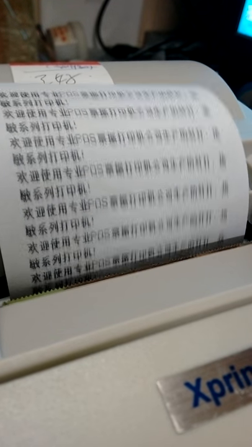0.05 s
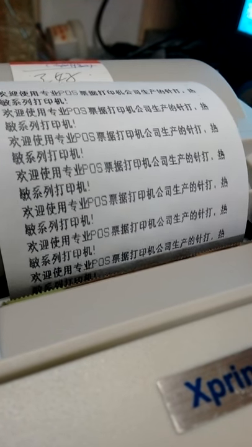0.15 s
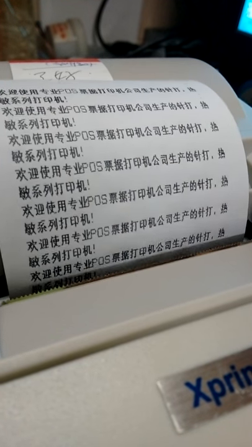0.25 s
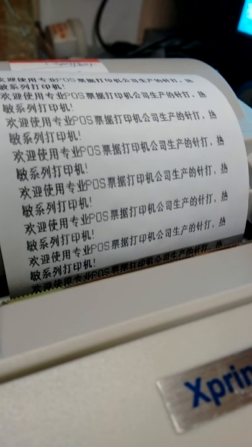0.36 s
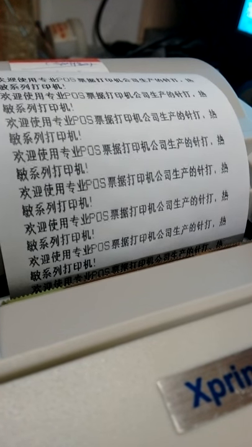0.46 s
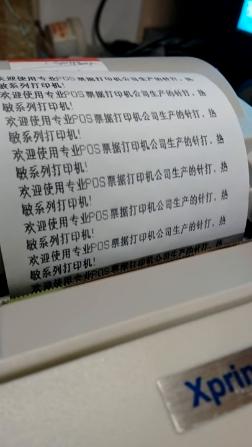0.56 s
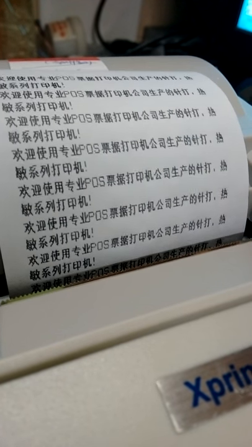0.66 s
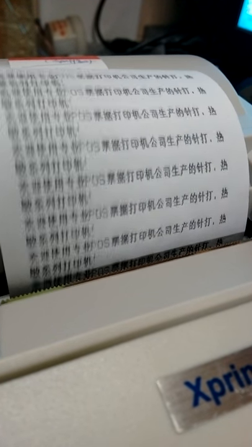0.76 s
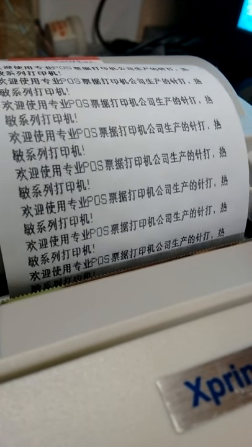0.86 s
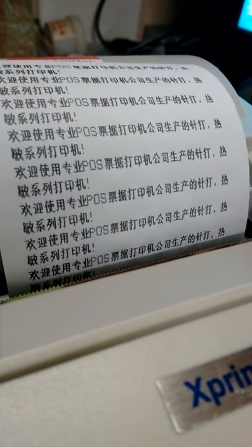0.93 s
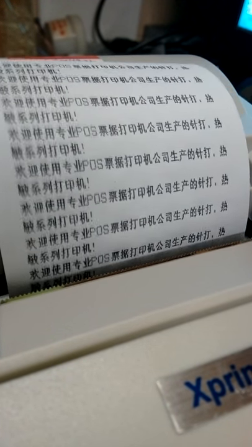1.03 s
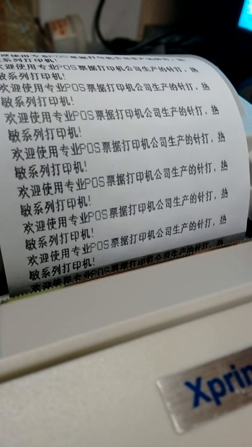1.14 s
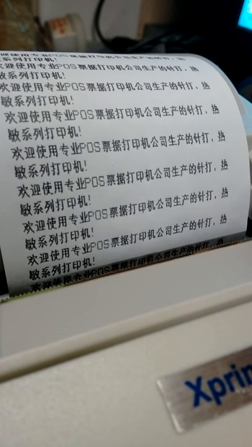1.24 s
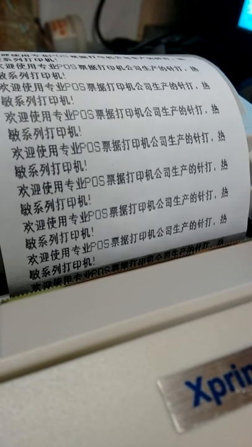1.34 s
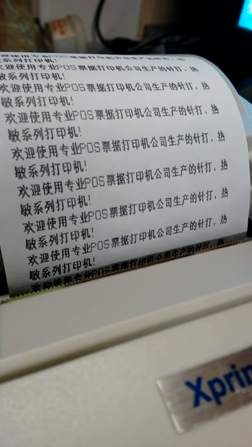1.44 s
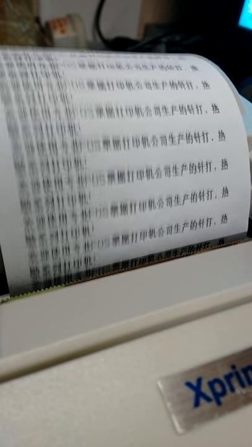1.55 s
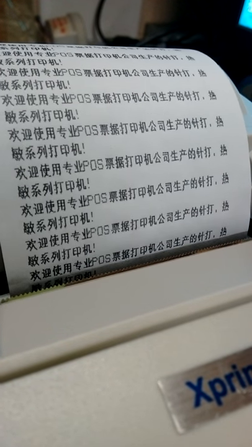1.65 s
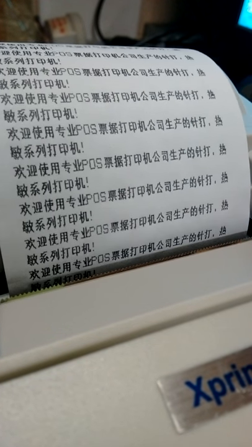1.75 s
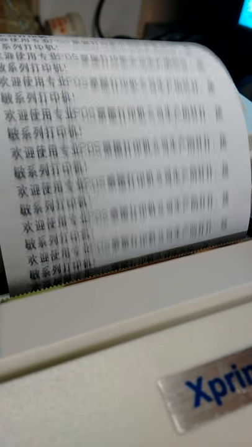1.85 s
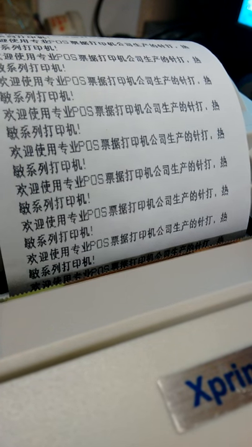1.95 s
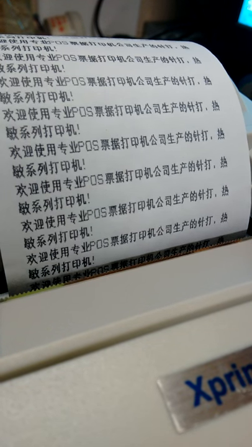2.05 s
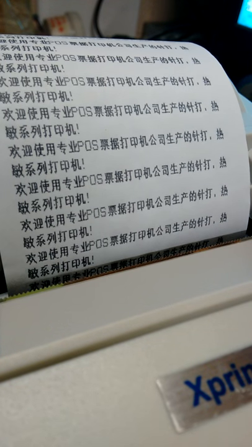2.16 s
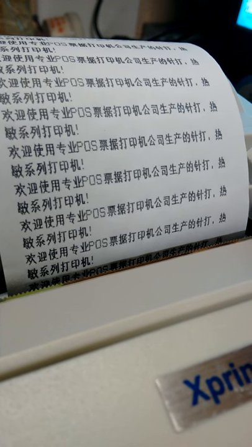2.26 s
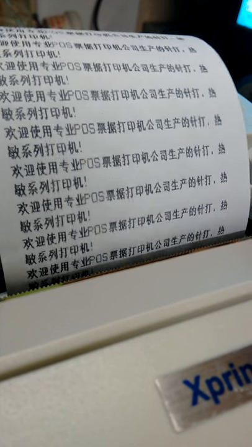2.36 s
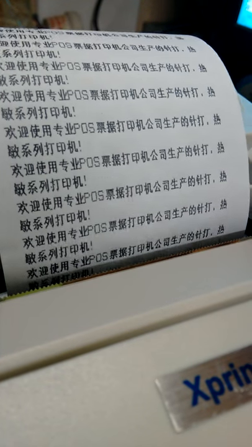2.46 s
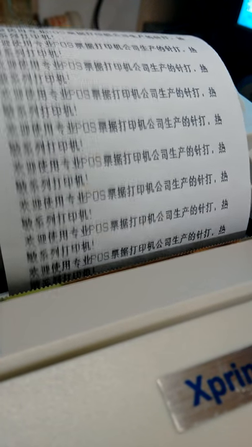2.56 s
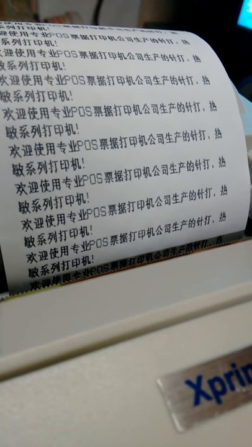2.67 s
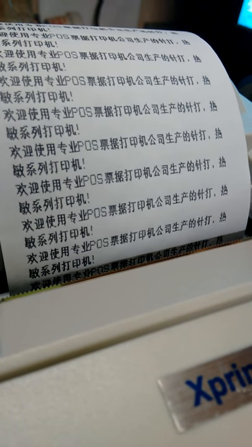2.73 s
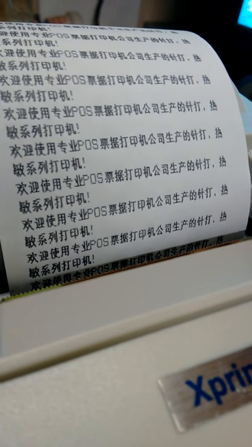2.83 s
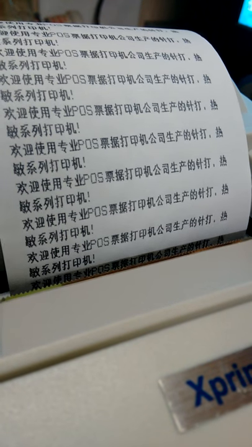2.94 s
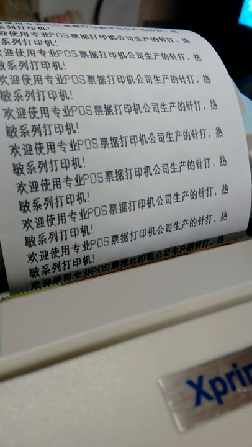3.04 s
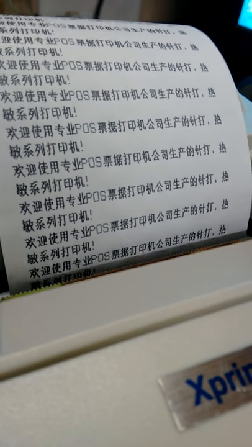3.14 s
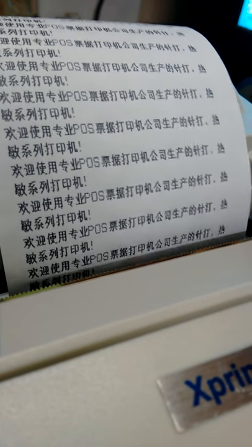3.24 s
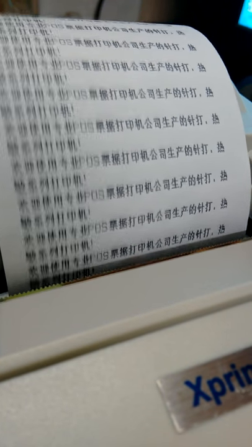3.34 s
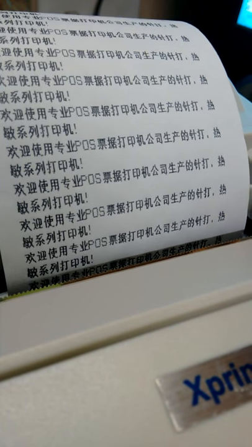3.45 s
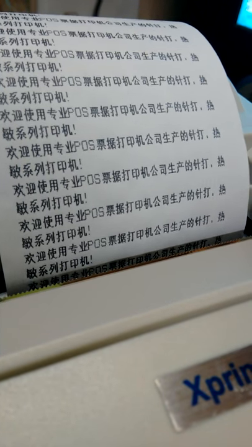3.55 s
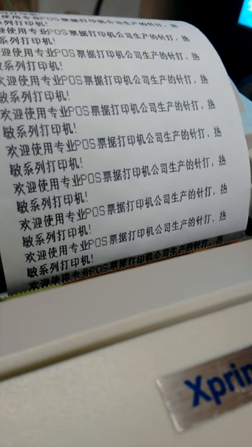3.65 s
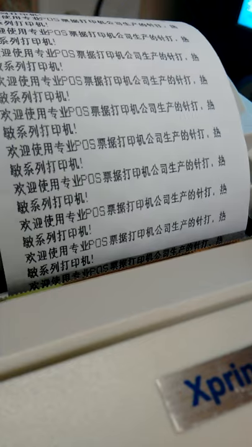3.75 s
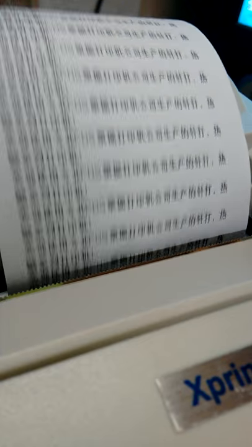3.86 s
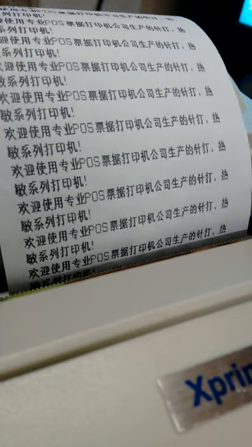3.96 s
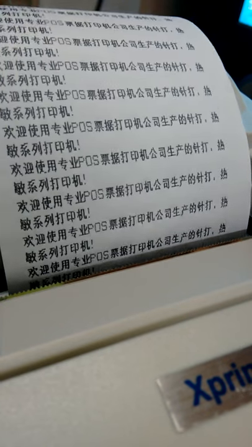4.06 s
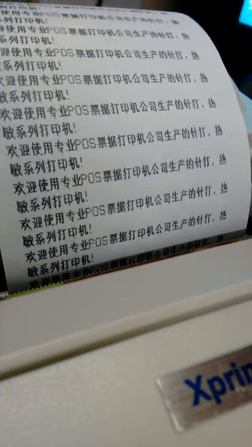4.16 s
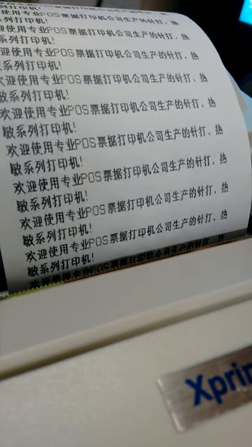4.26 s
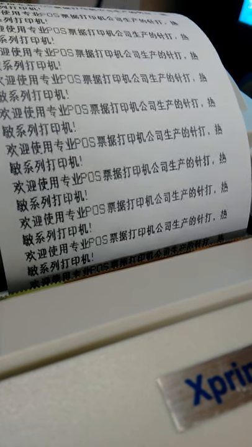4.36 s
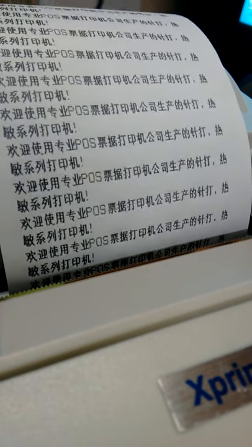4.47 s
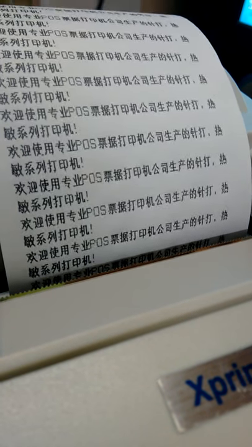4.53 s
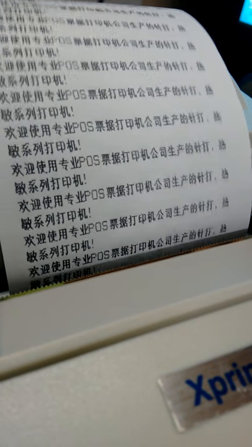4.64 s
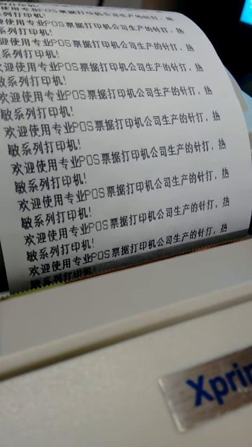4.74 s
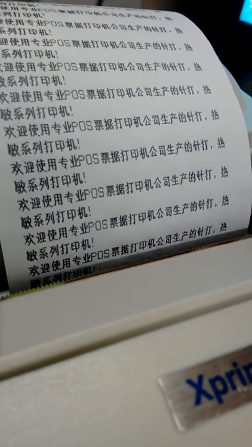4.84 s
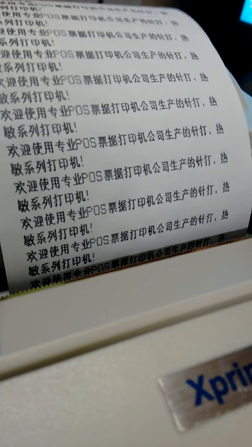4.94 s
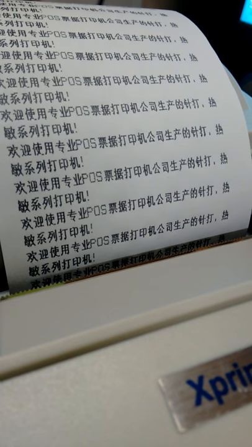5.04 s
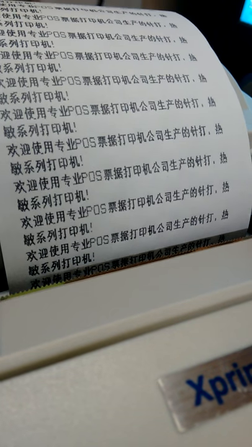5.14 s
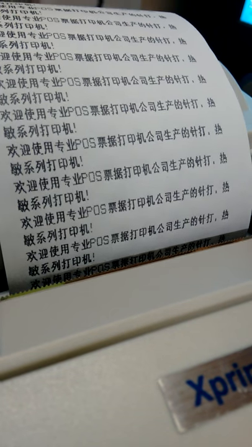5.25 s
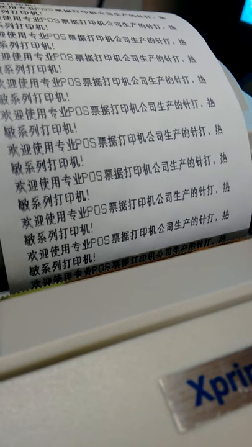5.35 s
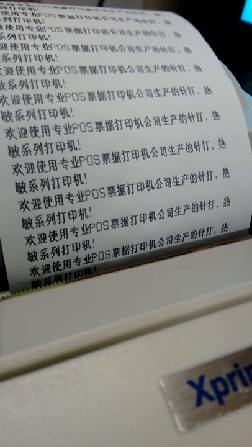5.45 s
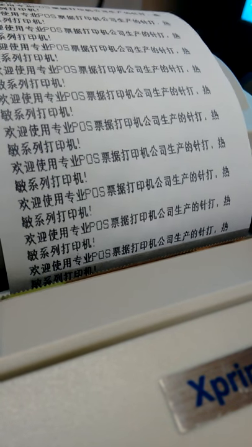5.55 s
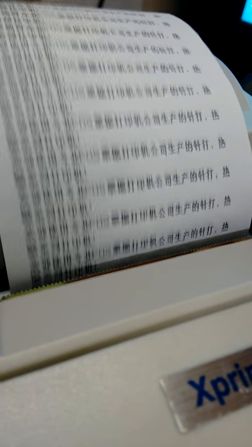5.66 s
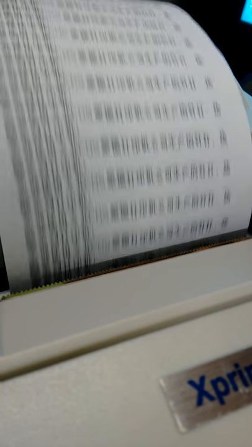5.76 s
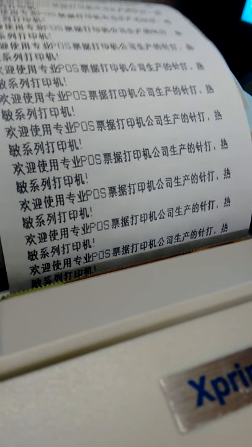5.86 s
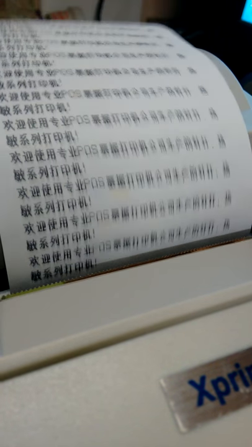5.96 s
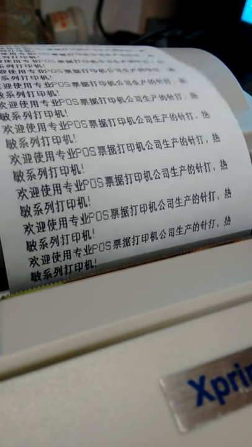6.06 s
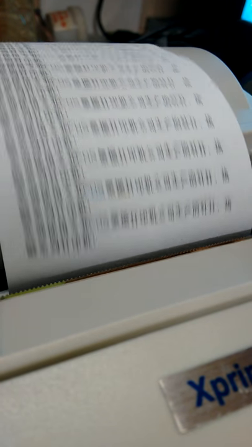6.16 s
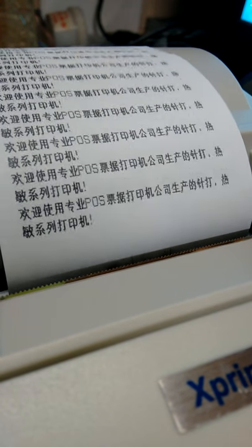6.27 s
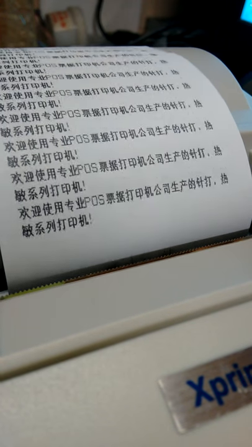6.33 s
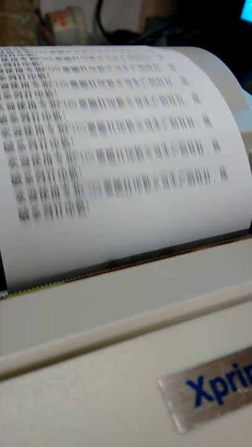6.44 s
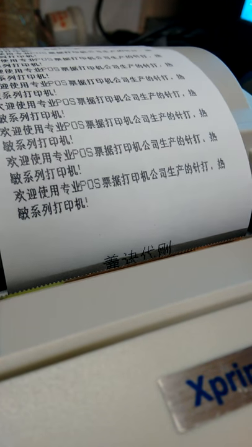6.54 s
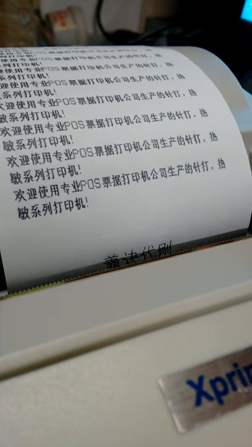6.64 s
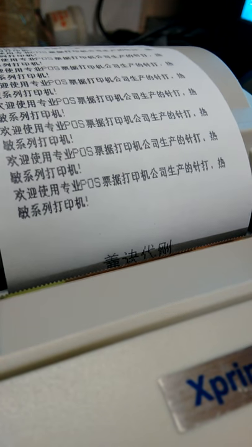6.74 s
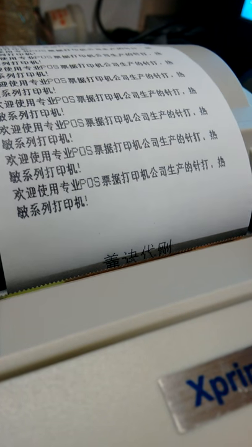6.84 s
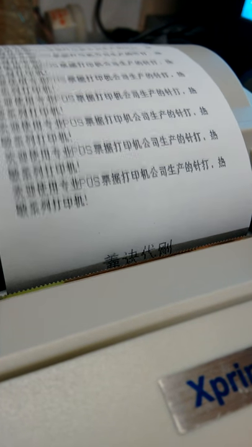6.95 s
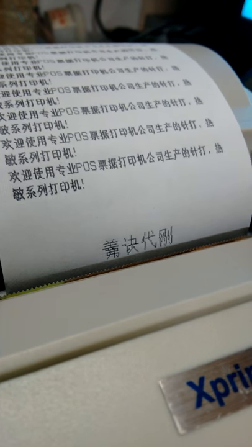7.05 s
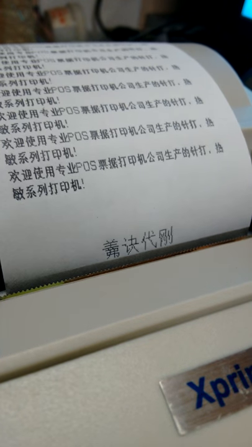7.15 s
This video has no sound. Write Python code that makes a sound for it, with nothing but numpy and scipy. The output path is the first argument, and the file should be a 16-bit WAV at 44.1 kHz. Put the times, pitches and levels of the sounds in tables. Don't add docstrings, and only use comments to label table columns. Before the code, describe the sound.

Pins hammer paper in fast, gritty zips, some long and some mere ticks, over a low motor rumble and belt hiss. Rattles and hollow case knocks fill the gaps in a regular mechanical loop. Near the end the loop breaks: gears engage, the feed motor whirs briefly, shorter buzzes follow, another feed, then scattered scratches and clacks. Close hand-held stereo pickup at a desk, piercing and mildly distorted, with a short room echo.

```python
import sys
import numpy as np
from scipy import signal
from scipy.fft import rfft, irfft, next_fast_len
from scipy.io import wavfile
from scipy.ndimage import uniform_filter1d, map_coordinates

SR = 44100
rng = np.random.default_rng(int(sys.argv[2]) if len(sys.argv) > 2 else 0)


def voltage_ratio(decibels):
    exponent = np.asarray(decibels, float) / 20
    return 10 ** exponent


def inscribe(sig):
    pcm = np.round(np.clip(np.atleast_2d(sig).T, -1, 1) * 32767)
    wavfile.write(sys.argv[1], SR, pcm.astype(np.int16))


N = 317500

COLUMN_HZ = 2369
CYCLE_START_S, CYCLE_S, CYCLE_END_S = .526, .7636, 5.76
RUN_AFTER_S = .066
# (start [s], strength [dB], fast run [s])
PAPER_FEEDS = [
    (5.806, -0.5, .083),
    (6.267, -0.1, .053),
]


def head():
    # (frequency [Hz], left [dB], right [dB])
    clock_lines = [(1530, -49, -44.5), (2380, 1, 9.5), (4700, -17.5, -9), (7400, -4, 9.5), (9400, -11, 16),
                   (12300, -14, 7.5), (14500, -25, -9.5)]
    # (frequency [Hz], level [dB])
    platen = [(700, -48), (1185, 3.5), (2000, -28), (8300, -6), (15000, -25)]
    when_s, rasp_size, tone_size, half_size = strikes()
    jitter_s = 5e-6 * wobble(150)[(when_s * SR).astype(int)]
    clock = pulses(when_s + jitter_s, tone_size * voltage_ratio(3.0 * rng.standard_normal(len(when_s))))
    hz, left_db, right_db = np.transpose(clock_lines)
    tones = voltage_ratio(22.0) * np.array([coloured(clock, np.c_[hz, left_db]), coloured(clock, np.c_[hz, right_db])])
    half = voltage_ratio([[22.5], [24.5]]) * coloured(pulses(when_s, half_size), platen)
    return pin_rasp(when_s, rasp_size), patchy(tones, depth_db=1.0) + half


def pin_rasp(when_s, size):
    # (frequency [Hz], density [dB per Hz])
    pin_left = [(300, -46), (840, -19.5), (930, 0.5), (1300, 2), (1600, -2), (2600, 0), (3400, -3.5),
                (4200, -6), (5200, 0), (7100, 2.5), (8500, -6), (10500, 8), (12000, 0.5), (15500, 2)]
    pin_right = [(300, -3.5), (840, -12.5), (930, 2), (1250, 5), (1600, -3), (2500, 0.5), (4000, 5.5),
                 (5500, 8), (7000, 14), (8800, 22), (9600, 16.5), (10500, 17), (12000, 6.5), (15500, 4.5)]
    # (frequency [Hz], width [Hz], level over the plain strike [dB])
    head_modes = [(969, 114, 7), (1285, 84, 6), (2035, 140, 5), (2650, 290, 5), (3306, 96, 4),
                  (5050, 600, 1.5), (5990, 140, 0), (6560, 37, 5.5), (7143, 203, 6.5), (7710, 210, 3.5),
                  (8217, 250, 3.5), (8900, 230, 2.5), (9360, 160, 7.5), (12100, 390, 6.5),
                  (12800, 410, 8.5), (14150, 410, 4)]

    def scattered():
        late_s = rng.normal(0, 9e-5, len(when_s))
        return pulses(when_s + late_s, size * rng.standard_normal(len(when_s)))

    left, right = [sum(scattered() for _ in range(3)) for _ in range(2)]
    apart = signal.butter(2, 1700, "high", fs=SR, output="sos")
    left = right + signal.sosfilt(apart, .8 * left - .4 * right)
    struck = np.array([coloured(left, pin_left), coloured(right, pin_right)])
    return patchy(voltage_ratio(4.5) * ring(struck, head_modes, plain=0.96), depth_db=2.0)


def strikes():
    glyph, blank = 18, 3
    when_s, rasp, tone, half = [], [], [], []
    for start_s, rasp_db, length_s, clock_db, half_db in printing():
        col = np.arange(int(length_s * COLUMN_HZ))
        double_width = start_s > CYCLE_END_S
        wide = 2 if double_width else 1
        density_db = rng.normal(0, 1, (len(col) // glyph + 1, 2)) * [1.5, 3.5]
        ink = voltage_ratio(density_db[col // glyph]).T
        in_blank = [[.24 if double_width else .4], [.12]]
        ink = ink * np.where(col // wide % glyph < glyph - blank, 1, in_blank)
        when_s.append((np.ceil(start_s * COLUMN_HZ) + col) / COLUMN_HZ)
        rasp.append(voltage_ratio(rasp_db) * ink[0])
        tone.append(voltage_ratio(clock_db - 17.5) * ink[1])
        half.append(voltage_ratio(half_db - 22.5) * ink[0] * (-1.) ** col)
    return map(np.concatenate, (when_s, rasp, tone, half))


def printing():
    # (start [s], rasp [dB], length [s], clock tone [dB], half-clock tone [dB])
    line_print = [(.001, -17.5, .046, -24, -21), (.060, -17, .094, -10, -16),
                  (.160, -19.5, .009, -12.5, -27), (.231, -20.5, .008, -9.5, -30),
                  (.244, -17, 0.098, -11, -34), (.347, -16.5, .049, -22, -26), (.487, -17, 0.046, -20, -19),
                  (.602, -17.5, 0.046, -21.5, -22)]
    last_print = [(6.04, -17.5, .0605, -17.5, -2), (6.187, -17.5, .0595, -23, -4.5),
                  (6.433, -17.5, 0.031, -17, -26), (6.533, -15.5, .037, -18, -25),
                  (6.781, -20, 0.0023, -35, -35), (6.795, -20.5, 0.0076, -19, -24),
                  (6.811, -17.5, .013, -21, -21.5), (7.022, -17.5, 0.04, -20, -23),
                  (7.068, -24.5, 0.011, -32, -34), (7.086, -22, 0.0072, -39, -28)]
    fullness_db = [-7.5, -3.5, -0.8, 0.9, -2.5, 1.6, 0.6, 0.8]
    rows = np.array(repeated(line_print, [], db_scatter=0.73, s_scatter=0.00044))
    cycle = ((rows[:, 0] - CYCLE_START_S + .01) // CYCLE_S).astype(int) + 1
    rows[:, 3] += np.take(fullness_db, cycle)
    rows[:, 3:] += rng.normal(0, 1, (len(rows), 2)) * [1.2, 1.8]
    return [*rows, *last_print]


def patchy(x, depth_db):
    z = signal.stft(x, nperseg=256)[2]
    field = uniform_filter1d(uniform_filter1d(rng.standard_normal(z.shape), 3, 1), 8, 2)
    return signal.istft(z * voltage_ratio(depth_db * field / np.std(field)), nperseg=256)[1][:, :N]


def carriage():
    # (time in the repeat [s], peak [dB], length [ms], dull part [dB])
    line_rattles = [(.155, -8, 6.5, -20), (.237, -5, 4.9, -24), (.186, -6.5, 2.77, -16),
                    (.21, -13, 22.5, -22), (.413, -8.5, 8.3, -10), (.449, -19, 4.2, 11),
                    (.468, -28, 2.9, -20.5), (.552, -12.5, 4.1, 0), (.578, -9, 16, -26),
                    (.666, -43, 4, -26), (.69, -19, 19, 6.5), (.726, -21, 7.2, 12), (.746, -14, 3.3, -16)]
    # (time [s], peak [dB], length [ms], dull part [dB])
    last_rattles = [(5.769, -18, 7.9, -12), (6.032, -15, 2.5, -8), (6.118, -20, 6, 4), (6.148, -23, 4, 4),
                    (6.164, -12, 10.3, -11), (6.483, -18.7, 4.6, -10.5), (6.512, -22, 7.5, -17),
                    (6.521, -19, 3.5, -15), (6.62, -11, 3.4, 6), (6.638, -25, 5.3, -15),
                    (6.693, -11, 3.2, -14), (6.701, -22, 7.2, -28), (6.74, -19, 7, 4), (6.75, -11, 5.7, -1),
                    (6.762, -19, 7, -20.5), (6.853, -17, 4.9, -7), (6.865, -15, 3.4, -4),
                    (6.889, -9.5, 9.2, -24), (6.931, -18, 6.4, -15), (6.945, -11, 5.5, -22),
                    (6.992, -17, 3, -14.5), (7.002, -14, 7.8, -6), (7.106, -16.3, 5.8, -6),
                    (7.114, -15, 2.6, 4), (7.141, -17, 10.5, 3), (7.161, -9, 5, -12)]
    # (frequency [Hz], density [dB per Hz])
    hiss_left = [(800, -19.5), (1500, -10.5), (2500, -12), (4200, -23), (7000, -15.5), (10000, -15),
                 (15500, -16)]
    hiss_right = [(800, -23), (1500, -10.5), (2500, -3), (4200, -9.5), (6500, -6), (8500, 1), (11000, -11),
                  (15500, -18)]
    bright = np.pad(voltage_ratio(effort(-28, follows=0.45) + 3.43 * wobble(60)), (0, SR))
    dull = np.zeros(N + SR)
    t = np.arange(SR // 20) / SR
    for s, db, ms, dull_db in repeated(line_rattles, [*last_rattles, *feeds()[1]], db_scatter=2.0):
        attack = np.clip(t / .0008, 0, 1)
        shape = attack * voltage_ratio(-60 * np.clip(t - 0.0007 * ms, 0, 1) / 0.016)
        bright[round(s * SR):][:len(t)] += voltage_ratio(db - 12.5) * shape
        dull[round(s * SR):][:len(t)] += voltage_ratio(db + dull_db - 19.5) * shape
    grit = patchy(rng.standard_normal((2, N)), depth_db=2.8) * voltage_ratio(1.5 * wobble(700))
    hiss = np.array([coloured(grit[0], hiss_left), coloured(grit[1], hiss_right)])
    band = signal.butter(2, [900, 3500], "band", fs=SR, output="sos")
    thud = unit(signal.sosfilt(band, rng.standard_normal(N)))
    return bright[:N] * hiss / np.std(hiss[1]) + dull[:N] * thud


def drive():
    rumble_db = effort(-34.5, follows=0.3) + resting()
    a, b = unit(case(rng.standard_normal((2, N)) * voltage_ratio(3.07 * wobble(35))))
    rumble = voltage_ratio(rumble_db) * np.array([a + 0.15 * b, a - 0.14 * b])
    return rumble + motor(rumble_db) + gears()


def motor(rumble_db):
    # (frequency [Hz], level [dB])
    whine_lines = [(359, -43.5), (2372, -70), (7106, -51), (9472, -62), (11845, -57)]
    # (start in the repeat [s], level [dB], length [s], frequency [Hz])
    line_hums = [(.24, -44, 0.176, 130)]
    # (start [s], level [dB], length [s], frequency [Hz])
    travels = [(5.965, -38, .04, 365), (6.165, -37, .045, 362), (6.7, -36, .095, 350),
               (6.868, -36, .1, 350)]
    t = np.arange(N) / SR
    out = 0
    for hz, db in whine_lines:
        out = out + voltage_ratio(db - 2.5 + 6.1 * wobble(30)) * np.sin(2 * np.pi * hz * t + 0.49 * wobble(25))
    out = out * voltage_ratio(rumble_db + 35.5)
    for start_s, db, length_s, hz in repeated(line_hums, [*travels, *feeds()[2]], db_scatter=1.5):
        gate = np.clip(np.minimum(t - start_s, start_s + length_s - t) / 0.0077, 0, 1)
        out = out + voltage_ratio(db) * gate * np.sin(2 * np.pi * hz * t)
    return out


def gears():
    # (time in the repeat [s], peak [dB], frequency [Hz])
    line_knocks = [(.023, -29, 345), (.078, -23.5, 770), (.143, -22, 263), (.18, -23.5, 300),
                   (.198, -30, 770), (.214, -21, 367), (.257, -30, 460), (.412, -21.5, 762),
                   (.423, -23, 255), (.449, -23, 460), (.475, -27, 387), (.517, -28, 377), (.55, -23, 359),
                   (.579, -19, 354), (.594, -20, 370), (.63, -28.5, 358), (.665, -25, 302),
                   (.69, -24.5, 744), (.699, -21, 276), (.725, -22, 440), (.75, -36, 377)]
    # (time [s], peak [dB], frequency [Hz])
    last_knocks = [(6.091, -21, 780), (6.118, -18, 244), (6.169, -18, 367), (6.411, -24, 370),
                   (6.48, -24, 309.8), (6.512, -24, 355), (6.588, -16.5, 264), (6.645, -20, 370),
                   (6.693, -20.5, 361), (6.766, -22.5, 366), (6.809, -27, 245), (6.863, -19.5, 277),
                   (7.108, -17.5, 254), (7.112, -22, 770), (7.14, -19, 428), (7.178, -28, 350)]
    knock, chatter = np.zeros(N + SR), np.zeros(N + SR)
    t = np.arange(SR // 10) / SR
    for s, db, hz in repeated(line_knocks, [*last_knocks, *feeds()[0]], db_scatter=0.1):
        tone = np.sin(2 * np.pi * hz * t) * (1 - np.exp(-t / 0.0021))
        knock[round(s * SR):][:len(t)] += voltage_ratio(db - 3.5 - 60 * t / 0.073) * tone
        chatter[round(s * SR):][:len(t)] += voltage_ratio(db + 4.5 - 60 * t / 0.058) * rng.standard_normal(len(t))
    highpass = signal.butter(2, 170, "high", fs=SR, output="sos")
    return knock[:N] + signal.sosfilt(highpass, case(chatter))


def feeds():
    # (time after feed start [s], knock [dB], knock [Hz], rattle [dB], dull part [dB])
    engage = [
        (.001, -18, 259, -15, 2),
        (.03, -17.5, 445, -16, 5),
        (0.054, -16.5, 257, -14.5, 0),
    ]
    engage_ms = [6.5, 6.2, 18]
    # (time after the run's end [s], peak [dB], length [ms], dull part [dB])
    brake = [
        (-.006, -15.5, 12.3, -9),
        (.015, -14, 9.2, -15),
    ]
    hum_from_s = -0.0083
    knocks, rattles, hums = [], [], []
    for s, db, run_s in PAPER_FEEDS:
        stop_s = s + RUN_AFTER_S + run_s
        for (t, knock_db, hz, rattle_db, dull_db), ms in zip(engage, engage_ms):
            knocks.append((s + t, db + knock_db, hz))
            rattles.append((s + t, db + rattle_db, ms, dull_db))
        knocks.append((stop_s + brake[0][0], db - 17.5, 445.5))
        rattles += [(stop_s + t, db + peak_db, ms, dull_db) for t, peak_db, ms, dull_db in brake]
        hums.append((s + hum_from_s, db - 34, RUN_AFTER_S - hum_from_s, 780))
        hums.append((s + RUN_AFTER_S, db - 30.5, run_s, 808))
    return knocks, rattles, hums


def resting():
    t = np.arange(N) / SR
    rest = 0
    for s, _, run_s in PAPER_FEEDS:
        start_s = s + RUN_AFTER_S
        rest = rest + np.clip(np.minimum(t - start_s, start_s + run_s - .012 - t) / .008, 0, 1)
    return -6 * rest


def effort(db, follows):
    # (time [s], level [dB])
    effort_points = [(0, 5.5), (2, -4), (4, 4), (5.76, 1.5), (5.87, -0.5), (5.94, -10), (6.03, -12),
                     (6.06, 5.5), (6.32, 1), (6.35, 0), (6.42, -15), (6.45, 2.5), (6.65, 3.5), (6.73, -4.5),
                     (6.85, -1.5), (7.05, -2), (7.2, -7)]
    return db + follows * np.interp(np.arange(N) / SR, *np.transpose(effort_points))


def case(x):
    # (frequency [Hz], width [Hz], level [dB])
    body_modes = [(130, 26, -6), (255, 43, 5.5), (361, 77, 1.5), (460, 123, -5), (610, 600, -5),
                  (757, 196, 2.5), (2350, 240, -19), (3040, 140, -39)]
    return ring(x, body_modes)


def room(x):
    # (frequency [Hz], t60 [s])
    room_t60 = [(300, 0.14), (2000, 0.12), (8000, 0.14), (15000, 0.12)]
    out, step = np.zeros((2, N + SR)), SR // 8
    for i in range(0, N, step):
        hz, t, z = signal.stft(rng.standard_normal((2, SR // 5)), SR, nperseg=128)
        decay = voltage_ratio(-60 * t / along(room_t60, hz)[:, None])
        tail = signal.istft(z * decay, SR, nperseg=128)[1]
        wet = signal.fftconvolve(x[:, i:i + step], tail / np.linalg.norm(tail[0]), axes=1)
        out[:, i:i + wet.shape[1]] += wet
    return out[:, :N]


def repeated(line_rows, last_rows, db_scatter, s_scatter=0.001194):
    rows = np.array([(CYCLE_START_S + k * CYCLE_S + s, *rest) for k in range(-1, 7) for s, *rest in line_rows])
    rows[:, :2] += rng.normal(0, 1, (len(rows), 2)) * [s_scatter, db_scatter]
    return [*rows[(rows[:, 0] > 0) & (rows[:, 0] < CYCLE_END_S)], *last_rows]


def pulses(when_s, size):
    at = when_s[:, None] * SR
    k = np.floor(at) + np.arange(-7, 9)
    w = size[:, None] * np.sinc(k - at) * np.cos(np.pi * (k - at) / 16) ** 2
    return np.bincount(np.clip(k, 0, N).astype(int).ravel(), w.ravel(), N + 1)[:N]


def ring(x, modes, plain=0):
    m = next_fast_len(N + SR // 4)
    f = np.fft.rfftfreq(m, 1 / SR)
    gain = plain
    for hz, width_hz, db in modes:
        gain = gain + voltage_ratio(db) * 1j * f * width_hz / (hz * hz - f * f + 1j * f * width_hz)
    return irfft(rfft(x, m) * gain, m)[..., :N]


def coloured(x, points):
    m = next_fast_len(N + SR // 4)
    cep = irfft(np.log(voltage_ratio(along(points, np.fft.rfftfreq(4096, 1 / SR))) + 1e-6))
    cep[1:2048] *= 2
    cep[2049:] = 0
    impulse = irfft(np.exp(rfft(cep)))
    return irfft(rfft(x, m) * rfft(impulse, m), m)[..., :N]


def along(points, hz):
    f, v = np.transpose(points)
    return np.interp(np.log(hz + 1), np.log(f + 1), v)


def wobble(rate_hz):
    return map_coordinates(rng.standard_normal(int(N * rate_hz / SR) + 4), [np.arange(N) * rate_hz / SR])


def unit(x):
    return x / np.sqrt(np.mean(x ** 2, axis=-1, keepdims=True) + 1e-20)


def scene():
    rasp, tones = head()
    echo = voltage_ratio([[-2.5], [-17]]) * room(coloured(rasp + 0.51 * tones, [(800, -5.0), (2200, 1.5)]))
    x = voltage_ratio([[-4], [0]]) * rasp + tones + echo
    x = x + carriage() + drive() * voltage_ratio([[-.8], [.8]])
    x = x + voltage_ratio(-55) * rng.standard_normal((2, N))
    left_lag = 12
    return np.array([np.roll(x[0], left_lag), x[1]])


def roll_off(x):
    return signal.sosfilt(signal.butter(12, 15630, fs=SR, output="sos"), x)


def record(dry):
    top = np.where(dry > 0, .87, .98)
    mix = dry / (1 + np.abs(dry / top) ** 6) ** (1 / 6)
    return roll_off(mix)


dry = scene()
out = record(dry)
inscribe(out)
```